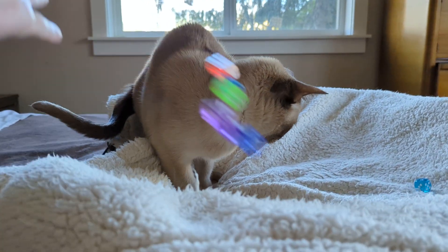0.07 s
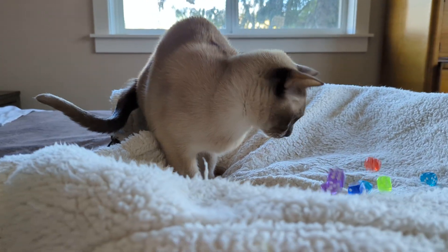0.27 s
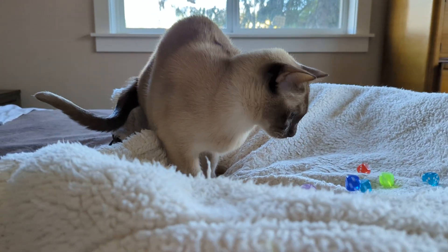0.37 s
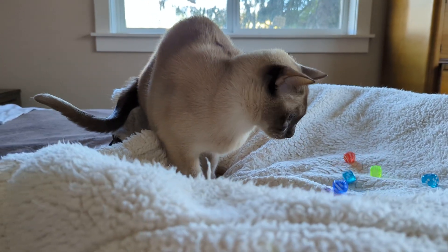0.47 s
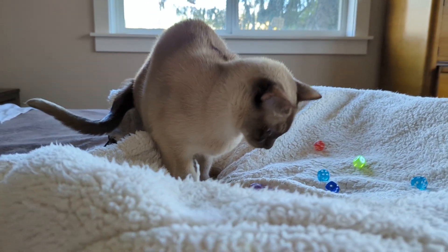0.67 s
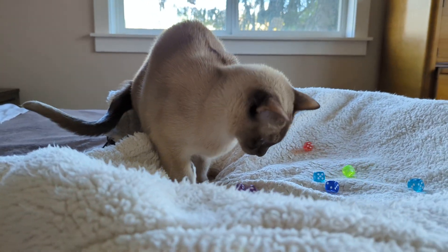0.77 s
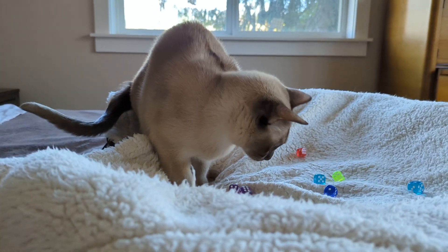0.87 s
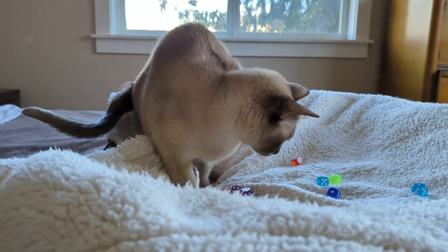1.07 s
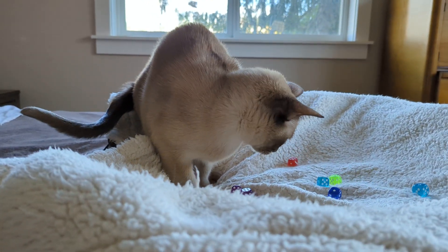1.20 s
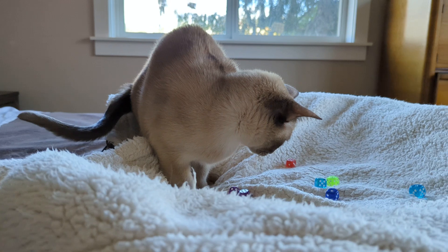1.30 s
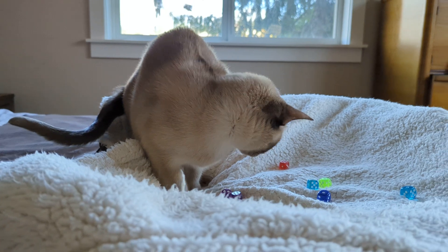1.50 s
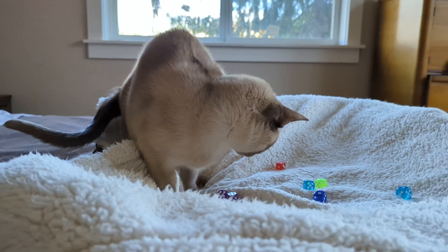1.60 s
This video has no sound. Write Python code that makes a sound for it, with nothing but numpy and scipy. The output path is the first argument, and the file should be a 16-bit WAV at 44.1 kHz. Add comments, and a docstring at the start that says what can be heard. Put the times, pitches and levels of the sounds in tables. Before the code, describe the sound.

Small plastic dice click against each other as they land on a soft blanket.

```python
"""A small bedroom, with a low, uneven rumble under everything.
A handful of small plastic dice lands on a blanket: they thud softly into the mattress and click
against each other, each click a hard snap with a brief ring that the walls answer.
One more pair meets a moment later, then the dice roll out over the fleece with a faint rustle."""
import sys
import numpy as np
from scipy import signal
from scipy.fft import rfft, irfft, next_fast_len
from scipy.io import wavfile
from scipy.ndimage import uniform_filter1d

SR = 44100
rng = np.random.default_rng(int(sys.argv[2]) if len(sys.argv) > 2 else 0)


def unload_wav(signal):
    """Save mono or channel-first audio to the path in sys.argv[1] as 16-bit WAV at rate SR, clipped to [-1, 1]."""
    wavfile.write(
        sys.argv[1],
        SR,
        np.round(np.clip(np.atleast_2d(signal).T, -1, 1) * 32767).astype(np.int16),
    )


N = 72765
T = np.arange(N) / SR


def amp(db):
    """Decibels to gain."""
    return 10 ** (np.asarray(db) / 20)


def unit(x):
    """Scale to rms 1."""
    return x / np.sqrt(np.mean(x ** 2) + 1e-20)


def along(points, hz):
    """Read a curve on a log frequency axis."""
    f, v = np.transpose(points)
    return np.interp(np.log(hz + 1), np.log(f + 1), v)


def fader(rows):
    """Gain per sample from (t/s, level/dB) points."""
    return amp(np.interp(T, *np.transpose(rows)))


def filtered(x, response):
    """Apply a frequency response to x."""
    n = x.shape[-1]
    m = next_fast_len(n + SR // 4)
    return irfft(rfft(x, m) * response(np.fft.rfftfreq(m, 1 / SR)), m)[..., :n]


def white(alike, size):
    """White stereo noise with channel correlation `alike`."""
    mid, side = rng.standard_normal((2, size))
    width = np.arccos(np.clip(alike, -1, 1)) / 2
    mid, side = np.cos(width) * mid, np.sin(width) * side
    return np.array([mid + side, mid - side])


def noise(eq, alike):
    """Coloured stereo noise of rms 1."""
    return unit(filtered(white(alike, N), lambda hz: amp(along(eq, hz))))


def panned(db):
    """Left and right gains; positive leans left."""
    return amp(np.array([[db], [-db]]) / 2)


def impulse(gain_db):
    """The tightest (minimum-phase) transient with this spectrum, of energy 1."""
    cepstrum = irfft(np.log(amp(gain_db)))
    half = len(cepstrum) // 2
    cepstrum[1:half] *= 2
    cepstrum[half + 1:] = 0
    pulse = irfft(np.exp(rfft(cepstrum)))
    return pulse / np.linalg.norm(pulse)


def add(out, start, x):
    """Mix x into out at `start` seconds."""
    part = out[:, max(round(start * SR), 0):][:, :x.shape[1]]
    part += x[:, :part.shape[1]]


# Rumble fader ride: t/s, level/dB
RUMBLE_RIDE = [(0, -66), (.2, -63), (.35, -62), (.385, -71.5), (.45, -60.5), (.6, -65.5), (.78, -68),
               (.86, -61), (.9, -71), (1.0, -58), (1.03, -68), (1.12, -66.5), (1.296, -76), (1.342, -63.5),
               (1.62, -65), (1.65, -65.5)]
# Rumble EQ, sub-heavy: f/Hz, level/dB
RUMBLE_EQ = [(20, -50.5), (30, -33), (41, -12), (59, -2.5), (75, -8.5), (100, -9), (150, -21.5), (220, -23),
             (400, -40.5), (2000, -91)]
# Room air fader ride: t/s, level/dB
AIR_RIDE = [(0, -79), (.3, -78), (.6, -77), (.73, -79), (.8, -84), (.99, -75), (1.04, -81), (1.15, -71.5),
            (1.2, -81), (1.29, -90), (1.35, -78.5), (1.56, -76.5), (1.65, -78)]
# Room air EQ, warm low mids: f/Hz, level/dB
AIR_EQ = [(60, -11.5), (130, 2), (220, -0.5), (310, -5), (450, -9.5), (800, -15), (1300, -23.5),
          (2500, -30.5), (6000, -43.5)]
# Hiss EQ: f/Hz, level/dB
HISS_EQ = [(100, 5), (2000, -0.5), (5000, -4), (9000, -3.5), (15500, -5), (16500, -20.5)]
DRONE_HZ, DRONE_WIDTH_HZ, DRONE_DB, HISS_DB = 256.3, 7, -81.5, -83.5


def room_tone():
    """Uneven rumble, room air with a narrow drone, and microphone hiss."""
    drone = filtered(white(.85, N), lambda hz: 1 / (1 + ((hz - DRONE_HZ) / DRONE_WIDTH_HZ) ** 2))
    rumble = fader(RUMBLE_RIDE) * noise(RUMBLE_EQ, alike=.85)
    air = fader(AIR_RIDE) * noise(AIR_EQ, alike=.29)
    hiss = amp(HISS_DB) * noise(HISS_EQ, alike=.13)
    return rumble + air + amp(DRONE_DB) * unit(drone) + hiss


# Rustle fader ride: t/s, level/dB
RUSTLE_RIDE = [(0, -75.5), (.1, -99), (.45, -78.5), (.68, -80), (.73, -80.5), (.78, -83.5), (.84, -77.5),
               (.98, -82), (1.2, -95), (1.65, -100)]
# Rustle EQ, light and airy: f/Hz, level/dB
RUSTLE_EQ = [(300, -10), (1000, -7.5), (2600, -3), (5000, -6.5), (8500, -5), (10500, -11.5), (13000, -7),
             (16000, -14)]


def fleece_rustle():
    """A whisper of cloth at the start, back again as the dice roll out over the fleece."""
    return fader(RUSTLE_RIDE) * noise(RUSTLE_EQ, alike=.3)


# Dice sinking into the bed: t/s, level/dB, f/Hz, t60/s
THUDS = [(.215, -54.5, 60.55, 0.45), (.266, -53, 270, .04), (0.28, -43.5, 67.8, 0.19),
         (.314, -40.5, 54.8, 0.15), (0.426, -49, 53.5, 0.27), (0.457, -69, 60, 0.073),
         (0.55, -51.5, 60, 0.32)]
THUD_ATTACK_S = 0.0072


def mattress_thuds():
    """The mattress gives under each landing and bounce: a low, damped sine with a soft attack."""
    out = np.zeros(N)
    for start, db, hz, t60 in THUDS:
        t = np.maximum(T - start, 0)
        attack = 1 - np.exp(-t / THUD_ATTACK_S)
        out -= amp(db - 60 * t / t60) * attack * np.sin(2 * np.pi * hz * t)
    return out * panned(db=-3)


# Die-on-die hits: t/s, level/dB, tilt/(dB per kHz), ring/dB, knock/dB, pan/dB, reverb send/dB
CLICKS = [(.2238, -18.5, -0.5, 4.5, -0.5, 1.5, 6), (.2263, -6, .1, 9, -3, -9, -4.5),
          (.2275, -14, 2, -6.5, -2.5, -2.5, -6), (.2427, -20.5, -0.7, -0.5, 1, 0, 2),
          (.2467, -11, 0, 7, 2.5, -7, -2), (.2651, -20.5, -0.4, 2.5, 6.5, -5.5, 2),
          (.2692, -25, -2, 5.5, 5.5, -9, 0.5), (.2748, -23.5, 0.5, 1, -2, 2, 9.5),
          (.2785, -19, 1.5, 5.5, -8.5, 6, -10), (.3050, -23, -.4, 2, 6.5, -5, -9),
          (.3213, -14.3, -.6, 0, 2, -1, -4.5), (0.3224, -23, -0.3, 6, 4.5, -11.5, -16),
          (0.3357, -24.5, -2.4, -4, -20, 8.5, -4), (.4048, -37.5, -0.03, 0.5, -16.5, -5, 8.5),
          (0.4169, -43.5, -0.1, 0, -6.5, 12, -3), (.5380, -25.5, 2.07, 6, -7, 0, 4.5),
          (.5388, -25.5, 2.5, 6, 3, 10, -1)]
# Snap EQ, bright hard plastic: f/Hz, level/dB
SNAP_EQ = [(300, -42), (1000, -29), (1600, -16.5), (2400, -7), (2950, -7), (3550, -4), (4300, -12),
           (5300, -4.5), (6500, 3), (7300, 0.5), (8400, 2.5), (9700, -1), (12500, 0.5), (14500, -11.5),
           (16500, -29)]
RING_HZ, RING_WIDTH_HZ = 11230, 720  # the brief ring of a die
KNOCK_HZ, KNOCK_WIDTH_HZ = 2143, 900  # the lower clack of a flat contact
CHATTER_T60_S, CHATTER_GAIN = .007, .8  # tiny rattles right after each contact
LEFT_LAG_S = .00003  # the dice fall to the right, so the left channel hears them later


def dice_clicks(size=512):
    """Each contact is a sub-millisecond snap with a brief ring and chatter, answered by the room."""
    out = np.zeros((2, N))
    hz, t = np.fft.rfftfreq(size, 1 / SR), np.arange(size) / SR
    ring = np.exp(-.5 * ((hz - RING_HZ) / RING_WIDTH_HZ) ** 2)
    knock = np.exp(-.5 * ((hz - KNOCK_HZ) / KNOCK_WIDTH_HZ) ** 2)
    offset_khz = (hz - RING_HZ) / 1000
    for start, db, tilt, ring_db, knock_db, pan_db, send_db in CLICKS:
        spectrum_db = along(SNAP_EQ, hz) + tilt * offset_khz + ring_db * ring + knock_db * knock
        snap = amp(db) * impulse(spectrum_db)[None]
        chatter = rng.standard_normal((2, size)) * amp(-60 * t / CHATTER_T60_S)
        contact = CHATTER_GAIN * chatter / np.linalg.norm(chatter, axis=1, keepdims=True)
        contact[:, 0] = 1  # the hit itself, ahead of its chatter
        direct = signal.fftconvolve(snap, contact, axes=1) * panned(pan_db)
        direct = filtered(direct, lambda f: np.exp(-2j * np.pi * np.outer([LEFT_LAG_S, 0], f)))
        add(out, start, direct)
        add(out, start, amp(send_db) * signal.fftconvolve(snap, bedroom_reverb(), axes=1))
    return out


# Bedroom decay times: f/Hz, t60/s
REVERB_T60 = [(500, 0.28), (2500, .19), (8000, 0.22), (14000, 0.15)]
# Reverb EQ: f/Hz, level/dB
REVERB_EQ = [(500, -0.5), (2000, -2), (3300, -4), (4400, 2), (6500, -2), (8200, 2.5), (10000, -1.5),
             (11300, -5), (13500, -0.5), (16000, -2.5)]
PREDELAY_S, BUILD_S, HOLD_S = 0.0038, 0.0031, 0.028
RETURN_DB, GRAIN_DB = -1.5, 5  # reverb level, unevenness of the echoes


def bedroom_reverb():
    """One answer of the room: a gap, a cluster of wall echoes, a short decay."""
    size = SR // 2
    t = np.arange(size) / SR
    wash = white(alike=.16, size=size)
    grain = amp(GRAIN_DB * np.repeat(rng.standard_normal(size), repeats=8)[:size])
    hz, frame_s, bands = signal.stft(unit(wash * grain), SR, nperseg=128)
    decay_db = 60 * np.maximum(frame_s - HOLD_S, 0) / along(REVERB_T60, hz)[:, None]
    bands *= amp(along(REVERB_EQ, hz)[:, None] - decay_db)
    build = 1 - np.exp(-np.maximum(t - PREDELAY_S, 0) / BUILD_S)
    tail = signal.istft(bands, SR)[1][:, :size] * build
    return tail / np.linalg.norm(tail[0]) * amp(RETURN_DB) * panned(db=-.5)


# Dice brushing the cloth: t/s, level/dB, length/s
PATS = [(0.263, -60, 0.021), (0.293, -73, 0.027)]
# Pat EQ, muffled mids: f/Hz, level/dB
PAT_EQ = [(100, -10), (240, -8), (350, 1.5), (550, -11.5), (800, -2.5), (1200, -6.5), (2000, -4),
          (5000, -17.5), (16000, -35.5)]


def blanket_pats():
    """The landing dice pat the blanket: short, dull puffs of noise."""
    envelope = np.zeros(N)
    for start, db, length in PATS:
        age = np.maximum(T - start, 0) / (length / 2)  # 1 at the peak
        envelope += amp(db) * age * np.exp(1 - age)
    return envelope * noise(PAT_EQ, alike=.6)


def scene():
    """Dice up front, then the bed, with room tone underneath."""
    return dice_clicks() + mattress_thuds() + blanket_pats() + fleece_rustle() + room_tone()


THRESHOLD_DB, CUT_SLOPE, MAX_CUT_DB = -59.5, 0.98, 10
CROSSOVER_HZ, LOWPASS_HZ = 1200, 16300


def record(dry):
    """A noise suppressor pulls the treble down when it is quiet; a steep low-pass trims the top."""
    treble = filtered(dry, lambda hz: 1 / (1 + (CROSSOVER_HZ / (hz + 1)) ** 4))
    power = uniform_filter1d(np.mean(treble ** 2, axis=0), size=600)
    treble_db = 10 * np.log10(np.abs(power) + 1e-14)
    cut_db = np.clip(CUT_SLOPE * (THRESHOLD_DB - treble_db), 0, MAX_CUT_DB)
    suppressed = dry + treble * (amp(-cut_db) - 1)
    return filtered(suppressed, lambda hz: 1 / (1 + (hz / LOWPASS_HZ) ** 160))


dry = scene()
out = record(dry)
unload_wav(out)
```